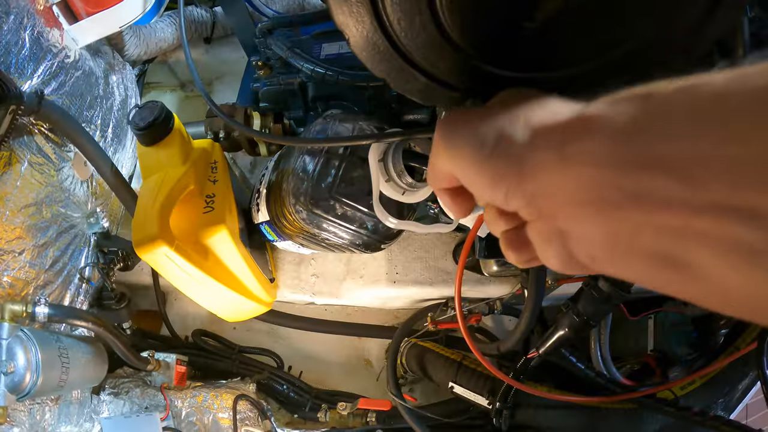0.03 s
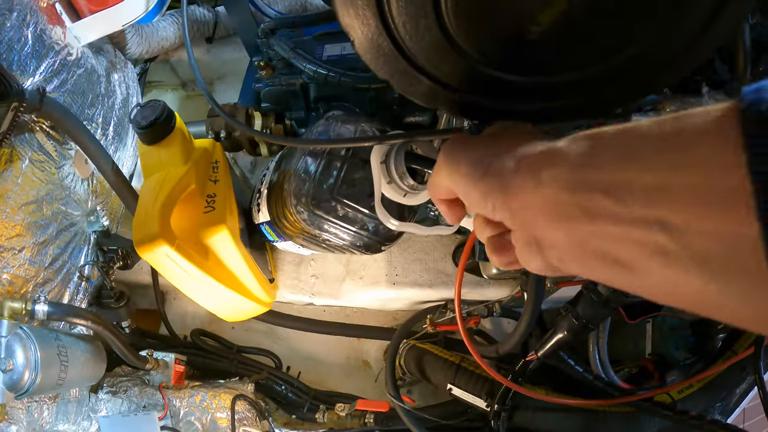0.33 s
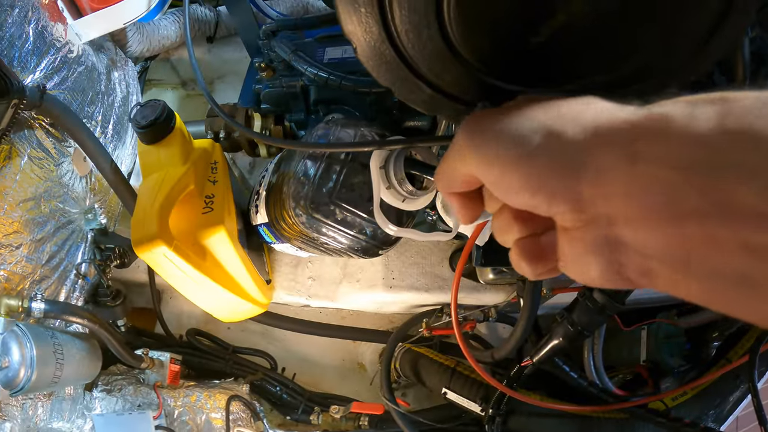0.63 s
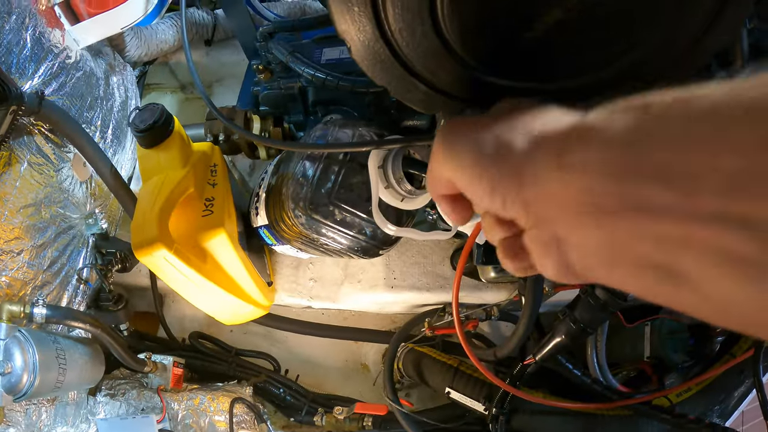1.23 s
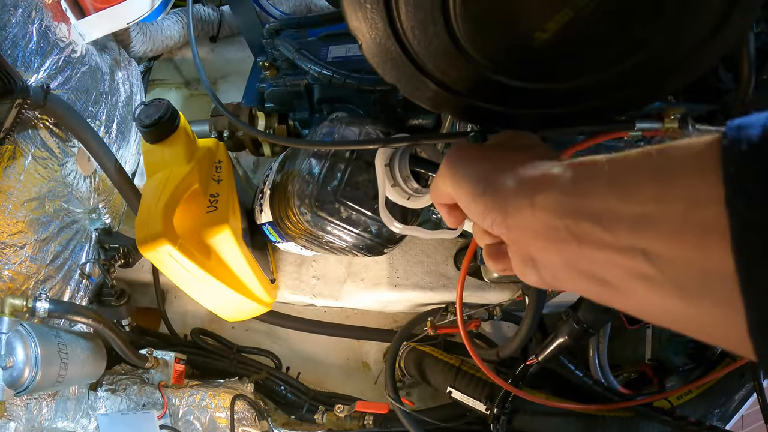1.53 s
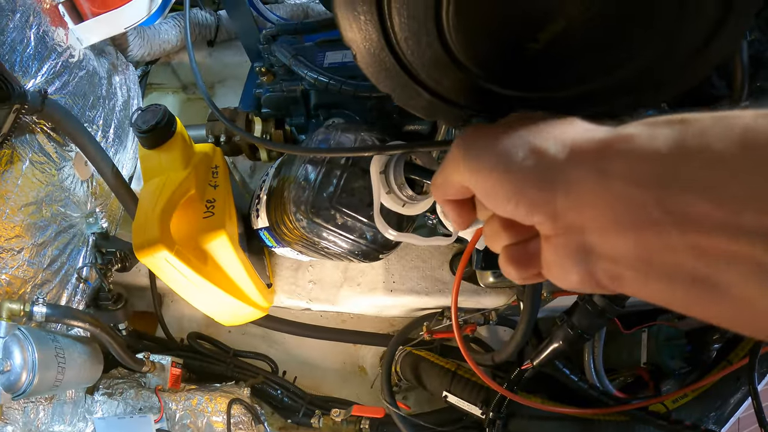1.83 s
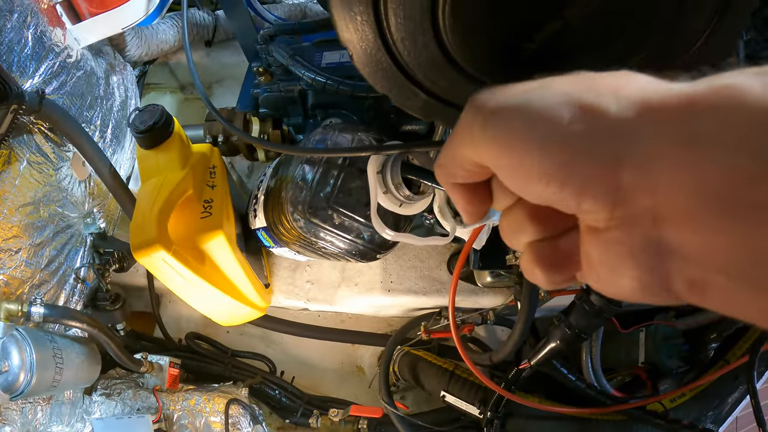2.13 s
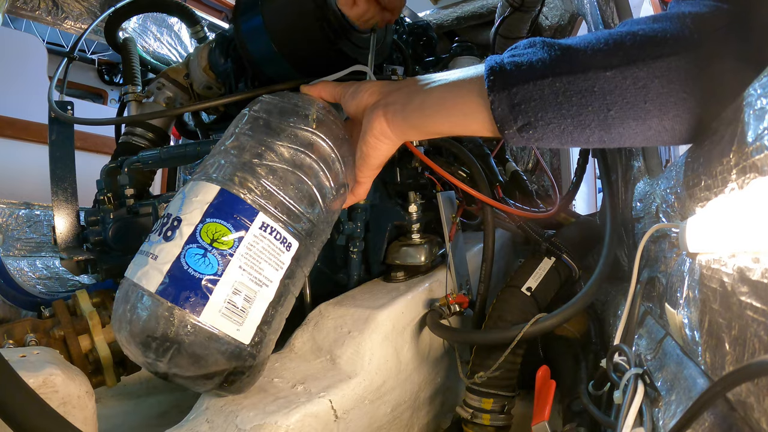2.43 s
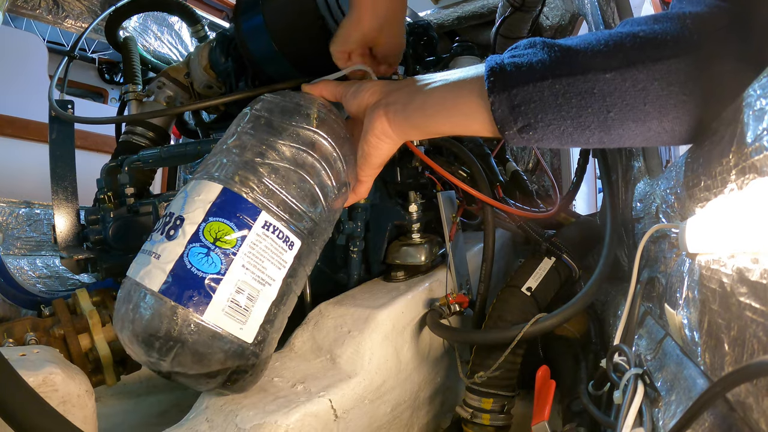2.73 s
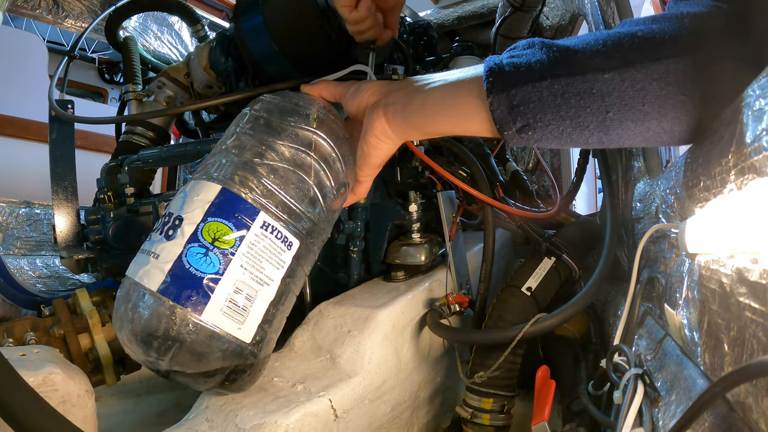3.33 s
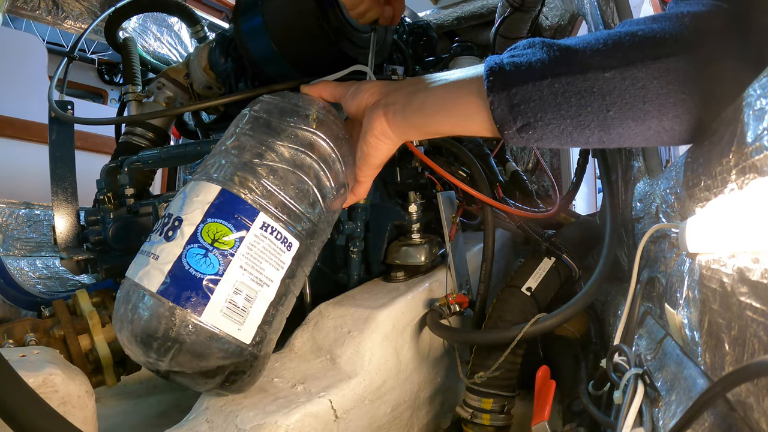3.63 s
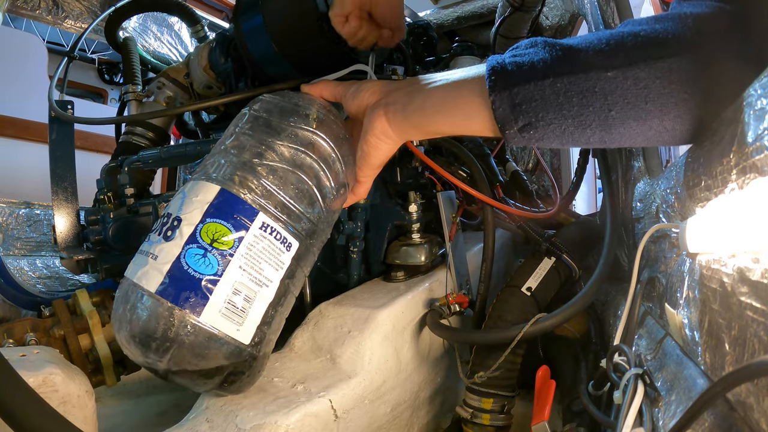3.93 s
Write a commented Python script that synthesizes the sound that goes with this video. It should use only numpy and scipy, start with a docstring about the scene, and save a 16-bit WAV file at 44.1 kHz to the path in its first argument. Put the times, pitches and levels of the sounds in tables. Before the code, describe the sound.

Close up in a padded engine bay, a hand oil pump rasps on each long stroke and spits air and oil on the returns. Clacks and a low rumble give way halfway to a plastic bottle knocking and booming.

```python
"""A cramped, padded boat engine bay: a hand pump sucks oil, heard first beside the pump, then beside
the waste bottle. Each long stroke rasps as the piston seal flutters and rings the barrel; each return
spits air and oil. The piston clacks at its turns, the plastic bottle knocks and booms, the hose
groans, and a low rumble lies under the first part."""
import sys
import numpy as np
from scipy import signal
from scipy.fft import rfft, irfft
from scipy.io import wavfile
from scipy.ndimage import uniform_filter1d

SR = 44100
rng = np.random.default_rng(int(sys.argv[2]) if len(sys.argv) > 2 else 0)


def unload_audio(sound):
    """Save the sound as a 16-bit wav file, at the path given as the first command line argument."""
    columns = np.transpose(np.atleast_2d(sound))
    # keep every value between -1 and 1, then stretch to whole-number steps
    steps = np.round(np.clip(columns, -1, 1) * 32767)
    wavfile.write(sys.argv[1], SR, steps.astype(np.int16))


N = 176400
T = np.arange(N) / SR
HZ = np.maximum(np.fft.rfftfreq(2 * N, 1 / SR), 1)
MOVE_S = 2.24  # listener moves from pump (NEAR) to bottle (FAR)
NEAR = T < MOVE_S
PUMP_SIDE, KNOCK_SIDE = 0.11, 0.51  # side/mid ratios


def undb(db):
    """Decibels to gain."""
    return 10 ** (np.asarray(db) / 20)


def unit(x):
    """Scale to rms 1."""
    return x / np.sqrt(np.mean(x ** 2))


def slope(points):
    """Gain curve through (frequency [Hz], gain [dB]) points."""
    hz, db = np.array(sorted(points)).T
    return undb(np.interp(np.log(HZ), np.log(hz), db))


def resonances(rows):
    """Gain curve of steep-skirted peaks (centre [Hz], width [Hz], gain [dB])."""
    return sum(undb(db) / (1 + 2 * ((HZ - hz * hz / HZ) / (2 * width)) ** 2) for hz, width, db in rows)


def colour(x, gain):
    """Minimum-phase filter; output rms 1."""
    cepstrum = irfft(np.log(gain + 1e-7))
    cepstrum[1:N] *= 2
    cepstrum[N + 1:] = 0
    return unit(irfft(rfft(x, 2 * N) * np.exp(rfft(cepstrum)))[..., :N])


def noise(side):
    """Stereo white noise of given side/mid ratio."""
    mid, wide = rng.standard_normal((2, N))
    return unit(mid + side * wide * np.array([[1], [-1]]))


def walk(rate_hz):
    """Random wander, rms 1."""
    return unit(np.interp(T * rate_hz, np.arange(N), rng.standard_normal(N)))


def ramp(elapsed, length):
    """Linear 0 to 1, then held."""
    return np.clip(elapsed / length, 0, 1)


def burst(start, rise_s, decay_s):
    """Linear rise, exponential decay."""
    return ramp(T - start, rise_s) * np.exp(-np.maximum(T - start - rise_s, 0) / decay_s)


def swell(middle_s, sigma_s):
    """Gaussian envelope."""
    return np.exp(-((T - middle_s) / sigma_s) ** 2 / 2)


def grains(spread_db):
    """Dense tiny bursts of air through oil."""
    return noise(PUMP_SIDE) * undb(spread_db * np.clip(walk(1800), -2.5, 2.5))


def ring(width_hz):
    """Complex narrowband noise around 0 Hz."""
    band = resonances([(0, width_hz, 0)])
    return colour(noise(PUMP_SIDE), band) + 1j * colour(noise(PUMP_SIDE), band)


def at_pitch(band, hz):
    """Shift a ring to a moving centre frequency."""
    return np.real(band * np.exp(2j * np.pi * np.cumsum(hz) / SR))


# Background spectra (frequency [Hz], gain [dB])
RUMBLE_SPECTRUM = [(12, -17.5), (22, 4.5), (46, -3), (140, -34), (215, -55.5), (600, -67), (1320, -120)]
FLOOR_SPECTRUM = [(15, -28), (25, 13), (81, 6), (234, 0), (358, -14.5), (885, -21.5), (1740, -7.5),
                  (2360, -22), (3200, -23.5), (5130, -10), (10100, -38.5), (13100, -49.5)]


def background(rumble_db=-38, floor_db=-58):
    """Uneven rumble until the move; faint steady noise throughout."""
    rumble = undb(rumble_db) * colour(noise(side=0.052), slope(RUMBLE_SPECTRUM))
    rumble *= undb(0.7 * walk(15)) * ramp(MOVE_S - T, 0.012)
    return rumble + undb(floor_db) * colour(noise(side=0.46), slope(FLOOR_SPECTRUM))


# Return strokes (start [s], end [s], level [dB], fade [dB/s]); negative fade swells
RETURN_STROKES = [(-.06, .24, -41.5, 93), (1.094, 1.5, -45, 59.5), (2.562, 2.778, -68.5, -38),
                  (3.863, 4.1, -43.5, 5)]
# Oil spurts (time [s], level before trim [dB], decay [s])
OIL_SPURTS = [(1.107, -42.5, 0.013), (1.143, -41, 0.011), (3.884, -33.5, 0.0084), (3.927, -34.5, 0.0051),
              (3.954, -42, .002)]
# Valve resonances (centre [Hz], width [Hz], gain [dB])
VALVE_MODES_NEAR = [(2500, 93, -13), (4070, 230, -4.5), (4540, 180, -1.5), (4960, 99, 0), (5600, 100, -3)]
VALVE_MODES_FAR = [(4440, 55, 2), (5310, 50, -1), (5710, 180, -2), (6530, 73, -14)]
# Air hiss (frequency [Hz], gain [dB])
AIR_HISS_NEAR = [(590, -47), (1000, -27.5), (1390, -15), (2300, -17.5), (2530, -11), (3040, -11.5),
                 (3990, -0.5), (5230, -14), (5660, -4.5), (10100, -45), (13100, -75)]
AIR_HISS_FAR = [(710, -51), (1200, -32), (2220, -34), (3320, -24.5), (4330, -8), (4910, -13), (5760, -7),
                (10100, -43.5), (13100, -60)]


def returns(attack_s=0.0049, release_s=0.039, waver_db=2.05, spurt_trim_db=-6):
    """Air and oil spit through the valve in spurts."""
    drive = np.zeros(N)
    for start, end, db, fade in RETURN_STROKES:
        gate = ramp(T - start, attack_s) * ramp(end - T, release_s)
        drive += gate * undb(db - fade * np.clip(T - start, 0, 1))
    drive *= undb(waver_db * walk(110))
    drive += sum(undb(db + spurt_trim_db) * burst(s, 0.003, decay) for s, db, decay in OIL_SPURTS)
    spit = grains(spread_db=3)
    near = np.hypot(resonances(VALVE_MODES_NEAR), undb(-3) * slope(AIR_HISS_NEAR))
    far = np.hypot(resonances(VALVE_MODES_FAR), undb(-0.5) * slope(AIR_HISS_FAR))
    return drive * np.where(NEAR, colour(spit, near), colour(spit, far))


# Froth swells (middle [s], sigma [s], level [dB])
FROTH_SWELLS = [(0.11, 0.075, -57.5), (1.3, 0.1, -57.5)]
# Froth resonances (centre [Hz], width [Hz], gain [dB])
FROTH_MODES = [(4860, 280, -0.5), (5880, 550, -10), (6630, 210, -5.5)]


def froth():
    """Bright froth fizzes in the valve late in a return."""
    fizz = colour(grains(spread_db=3), resonances(FROTH_MODES))
    return fizz * sum(undb(db) * swell(s, sigma) for s, sigma, db in FROTH_SWELLS)


# Soft bumps (time [s], level [dB], pitch drop [Hz], L-R [dB])
MIC_BUMPS = [(0.0327, -19, 560, 1), (3.3876, -24.5, 2000, -11.5)]


def bumps(end_hz=64, fall_s=0.00094, peak_s=0.0022):
    """Bumps against the microphone: short thuds whose pitch drops at once."""
    out = 0
    for s, db, drop_hz, pan_db in MIC_BUMPS:
        age = np.maximum(T - s, 0)
        cycles = end_hz * age + drop_hz * fall_s * (1 - np.exp(-age / fall_s))
        envelope = np.tanh(age * drop_hz) * np.sqrt(age / peak_s) * np.exp(-age / peak_s / 2)
        gain = undb(db + np.array([[pan_db], [-pan_db]]) / 2)
        out += gain * envelope * np.sin(2 * np.pi * cycles)
    return out


# Strokes (start [s], end [s], level [dB], swell [dB], release [s], flutter depth [0-1], flutter [Hz])
LONG_STROKES = [(0.369, 0.933, -47.5, 3, 0.032, 0.18, 102), (1.633, 2.232, -48.5, 3, 0.0033, 0.13, 97),
                (2.988, 3.607, -45, 2, 0.039, 0.27, 98.1)]
# Barrel resonances (centre [Hz], width [Hz], gain [dB])
BARREL_MODES_NEAR = [(1636, 220, -7.5), (2140, 61, -10), (2700, 170, -12.5), (3170, 47, -5), (3703, 180, 5),
                     (4120, 80, 5.5), (4875, 43, 10.5), (5440, 45, 5.5), (6900, 320, -6), (9050, 203, -9)]
BARREL_MODES_FAR = [(2637, 153, -12.5), (3164, 80, -13.5), (3847, 130, -1.5), (4450, 110, -3.5),
                    (5420, 70, 1), (5860, 100, -11), (6800, 170, -19.5), (7350, 150, -16),
                    (8920, 94, -18.5)]
# Hiss between the resonances (frequency [Hz], gain [dB])
BARREL_HISS_NEAR = [(470, -50), (800, -20), (1660, -8.5), (2290, -10), (4860, 6), (6200, -2), (7050, -3),
                    (7750, -10.5), (9190, -14), (10100, -19.5), (11000, -54), (15000, -53)]
BARREL_HISS_FAR = [(590, -33), (1000, -19), (2410, -23), (3350, -23), (3770, -6.5), (4480, -0.5),
                   (4840, -4), (5340, -8), (10100, -31.5), (13100, -65)]
# Seal resonance along the piston's travel (time [s], pitch [Hz])
SEAL_GLIDE = [(.4, 3777), (.93, 3703), (1.7, 3160), (1.9, 3250), (2.22, 3950), (3.0, 4413), (3.2, 4533),
              (3.5, 4270), (3.6, 3900)]


def strokes(attack_s=0.021, jitter=0.06, waver_db=0.58, seal_near_db=-11.5, seal_far_db=-4.5):
    """The seal flutters, chopping a grainy hiss that rings the barrel; its own ring glides."""
    drive = np.zeros(N)
    flutter_clock = np.cumsum(1 + jitter * walk(60)) / SR
    for start, end, db, swell_db, release, depth, hz in LONG_STROKES:
        gate = ramp(T - start, attack_s) * np.exp(-2 * np.maximum(T - end, 0) / release)
        pulses = unit(np.exp(-(flutter_clock * hz % 1) / 0.11))
        flutter = unit(1 + depth * (pulses - 1))
        travel = ramp(T - start, end - start)
        drive += gate * flutter * undb(db + swell_db * (travel - 0.5))
    air = grains(spread_db=-1.5) * drive * undb(waver_db * walk(45))
    near = np.hypot(resonances(BARREL_MODES_NEAR), undb(-5.5) * slope(BARREL_HISS_NEAR))
    far = np.hypot(resonances(BARREL_MODES_FAR), undb(-5) * slope(BARREL_HISS_FAR))
    rasp = colour(air * NEAR, near) * np.std(drive * NEAR)
    rasp += colour(air * ~NEAR, far) * np.std(drive * ~NEAR)
    seal = at_pitch(ring(width_hz=50), np.interp(T, *np.array(SEAL_GLIDE).T))
    ringing = uniform_filter1d(uniform_filter1d(drive, SR // 200), SR // 200)  # outlasts each pulse
    return rasp + ringing * seal * undb(np.where(NEAR, seal_near_db, seal_far_db))


# Clacks (time [s], level [dB])
PISTON_CLACKS = [(0.379, -41.5), (1.047, -44), (1.599, -49.5), (1.658, -43.5)]
# Clack spectrum (frequency [Hz], gain [dB])
CLACK_SPECTRUM = [(120, 8.5), (300, -9), (650, -2.5), (900, -9.5), (1450, 2.5), (2100, -16), (4200, -7.5),
                  (8000, -56)]


def clacks():
    """The piston meets its stop."""
    drive = sum(undb(db) * burst(s, rise_s=0.0016, decay_s=0.011) for s, db in PISTON_CLACKS)
    return drive * colour(noise(KNOCK_SIDE), slope(CLACK_SPECTRUM))


# Slurps (middle [s], sigma [s], level [dB], pitch [Hz])
OIL_SLURPS = [(.535, 0.006, -52.5, 3300), (.578, 0.011, -47, 3550), (0.621, 0.0084, -50.5, 3400),
              (1.153, 0.0045, -45, 3700), (2.065, 0.0061, -47, 4900), (3.413, 0.0057, -43.5, 3900),
              (3.867, 0.00092, -41.5, 4100), (3.932, 0.0022, -41.5, 4100)]


def slurps(sag_hz_per_s=9000):
    """Each slug of oil in the pump gives a short, coarse ring that sags in pitch."""
    band = ring(width_hz=330)
    return sum(undb(db) * swell(s, sigma) * at_pitch(band, hz - sag_hz_per_s * (T - s))
               for s, sigma, db, hz in OIL_SLURPS)


# Thumps (time [s], level [dB])
PUMP_THUMPS = [(.853, -48.5), (1.58, -53), (2.184, -51.5), (3.886, -44.5)]
# Thump resonances (centre [Hz], width [Hz], gain [dB])
THUMP_MODES = [(134.4, 64, 2.5), (286, 104, -8)]


def thumps(jostle_db=-62.5, scatter_db=5.5):
    """The handled pump thumps dully, with light irregular jostling between."""
    hits = sum(undb(db) * burst(s, rise_s=0.0013, decay_s=0.0093) for s, db in PUMP_THUMPS)
    jostle = undb(jostle_db + scatter_db * np.clip(walk(40), -2, 2)) * swell(1.346, 0.34)
    return (hits + jostle) * colour(noise(KNOCK_SIDE), resonances(THUMP_MODES))


def whistle(hz=4910, width_hz=14, db=-50.5):
    """The seal whistles briefly on the barrel's strongest resonance."""
    tone = colour(noise(PUMP_SIDE), resonances([(hz, width_hz, 0)]))
    return undb(db) * swell(middle_s=1.787, sigma_s=0.045) * tone


# Knocks (time [s], boom [dB], wall [dB], wall pitch [Hz], crack [dB])
BOTTLE_KNOCKS = [(2.274, -60, -50.5, 196, -53.5), (2.296, -29.5, -50.5, 172, -50),
                 (2.582, -37, -54, 174, -53.5), (2.64, -28, -44.5, 207, -51),
                 (2.71, -28, -40.5, 184.8, -44), (2.729, -71, -44, 189.7, -47.5),
                 (2.747, -82, -53, 193, -50), (2.828, -54, -47.5, 169, -57),
                 (3.173, -27.5, -45.5, 179, -41.5), (3.192, -73, -38, 183.7, -78),
                 (3.528, -25.5, -39.5, 195, -35.5)]
# Wall modes (ratio to wall pitch, gain [dB], T60 [s])
BOTTLE_WALL_MODES = [(.7, -1.5, 0.15), (0.999, 2.5, 0.13), (1.45, -18.5, 0.08), (1.98, -8, 0.081)]
# Crack spectrum (frequency [Hz], gain [dB])
CRACK_SPECTRUM = [(150, -37.5), (250, -2.5), (408, -5.5), (1660, -13), (3500, -20), (4500, -14.5),
                  (9000, -72)]
# Crack resonances (centre [Hz], width [Hz], gain [dB])
PLASTIC_MODES = [(395, 34, -1), (692, 31, -1.5), (933, 54, -7.5), (1170, 134, -11), (1654, 144, -3)]


def knocks(boom_hz=53.5, boom_peak_s=0.028):
    """Each knock cracks in the plastic and rings the walls; the larger ones boom the whole bottle."""
    body, crack = 0, 0
    for s, boom_db, wall_db, wall_hz, crack_db in BOTTLE_KNOCKS:
        age = np.maximum(T - s, 0)
        boom = (age / boom_peak_s * np.exp(1 - age / boom_peak_s)) ** 3.14
        tail = undb(-16) * burst(s, boom_peak_s, decay_s=0.099)
        hz = boom_hz * (1 + 0.064 * rng.standard_normal())
        body += undb(boom_db) * (boom + tail) * np.sin(2 * np.pi * hz * age)
        for ratio, db, t60 in BOTTLE_WALL_MODES:
            envelope = burst(s, rise_s=0.0074, decay_s=t60 / np.log(1000))
            body += undb(wall_db + db) * envelope * np.sin(2 * np.pi * wall_hz * ratio * age)
        crack += undb(crack_db) * burst(s, rise_s=0.0012, decay_s=0.013)
    plastic = np.hypot(slope(CRACK_SPECTRUM), resonances(PLASTIC_MODES))
    return body + crack * colour(noise(KNOCK_SIDE), plastic)


# Groans (middle [s], sigma [s], low register [dB], high register [dB])
HOSE_GROANS = [(3.063, 0.084, -66.5, -63.5), (3.689, 0.055, -54, -64)]
# Hose resonances (centre [Hz], width [Hz], gain [dB])
HOSE_MODES_LOW = [(286.5, 14.6, -5.5), (352, 77, -13)]
HOSE_MODES_HIGH = [(623, 55, 1.5), (771, 210, -7.5)]


def groans():
    """The hose groans faintly in two hollow registers."""
    low = colour(noise(KNOCK_SIDE), resonances(HOSE_MODES_LOW))
    high = colour(noise(KNOCK_SIDE), resonances(HOSE_MODES_HIGH))
    return sum(swell(s, sigma) * (undb(low_db) * low + undb(high_db) * high)
               for s, sigma, low_db, high_db in HOSE_GROANS)


# Reflection spectrum (frequency [Hz], gain [dB])
BAY_SPECTRUM = [(1200, 2.5), (2400, 7), (4200, -1), (9000, -42)]


def bay(x, t60_s=0.038, send_db=-8):
    """Adds the dense, very short reflections of the padded bay."""
    envelope = burst(0.0034, rise_s=0.0058, decay_s=t60_s / np.log(1000))
    tail = unit(rng.standard_normal((2, N)) * envelope) / np.sqrt(N)
    reflections = irfft(rfft(x, 2 * N) * rfft(tail, 2 * N) * slope(BAY_SPECTRUM))[:, :N]
    return x + undb(send_db) * reflections


# Pump stereo balance (frequency [Hz], L-R [dB])
PUMP_PAN = [(1000, -3.5), (1800, 0), (3100, 7), (4300, -3), (5500, -1.5), (7000, -1.5), (9500, 4.5)]


def scene():
    """Pump and bottle in the bay, over the rumble."""
    pump = strokes() + slurps() + whistle() + returns() + froth()
    lean = np.sqrt(slope(PUMP_PAN))
    panned = irfft(rfft(pump, 2 * N) * np.array([lean, 1 / lean]))[:, :N]
    return bay(panned + clacks()) + knocks() + thumps() + groans() + bumps() + background()


def record(dry):
    """Steep low-pass at 15 kHz."""
    return signal.sosfilt(signal.ellip(8, 0.2, 70, 15000, fs=SR, output="sos"), dry)


dry = scene()
out = record(dry)
unload_audio(out)
```